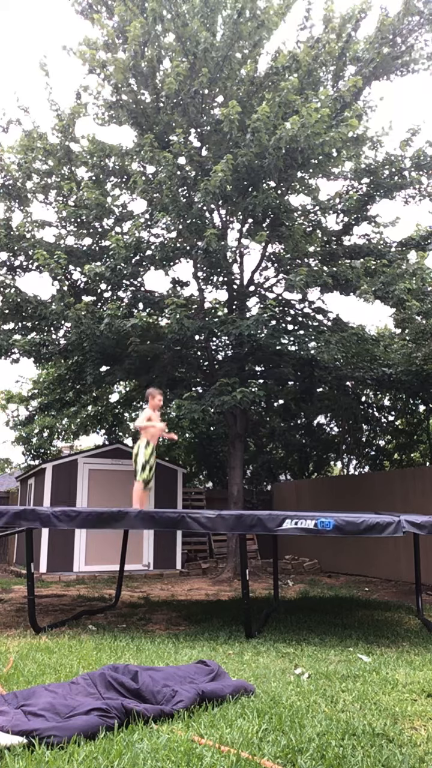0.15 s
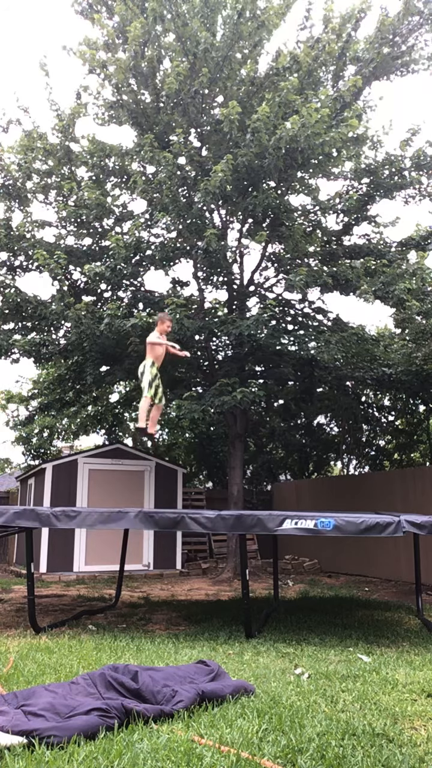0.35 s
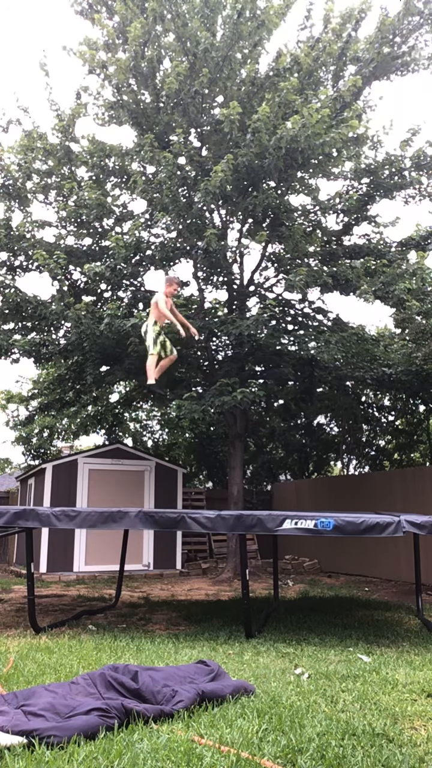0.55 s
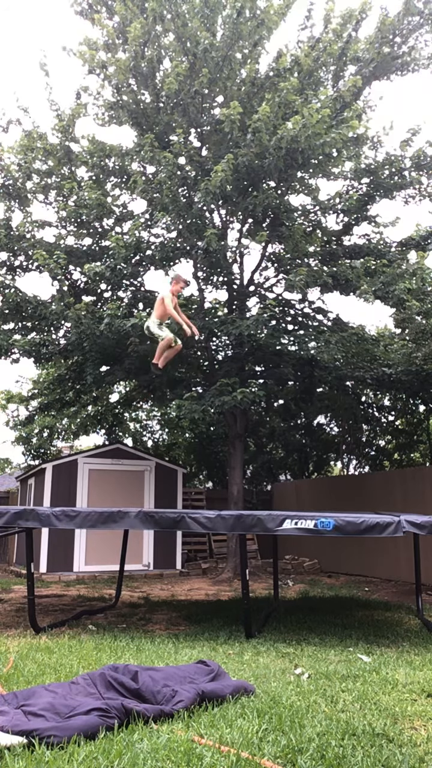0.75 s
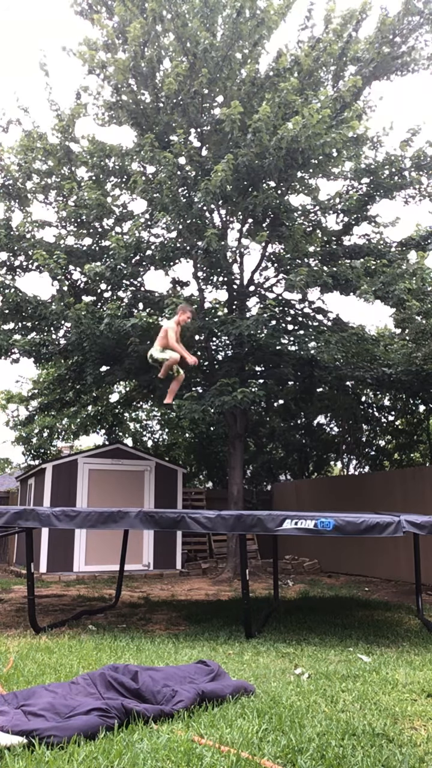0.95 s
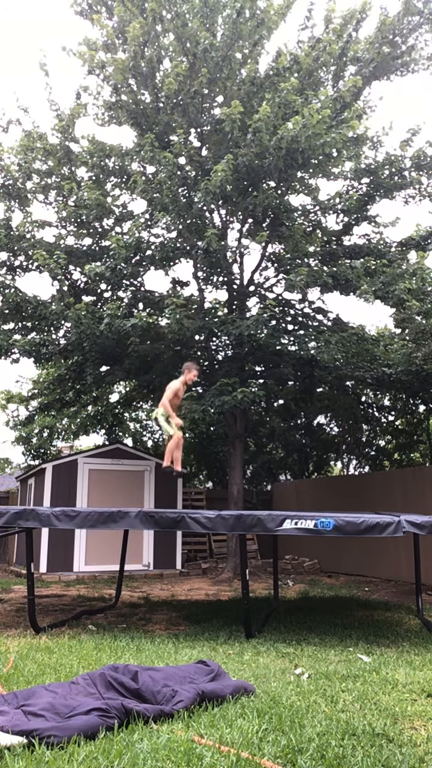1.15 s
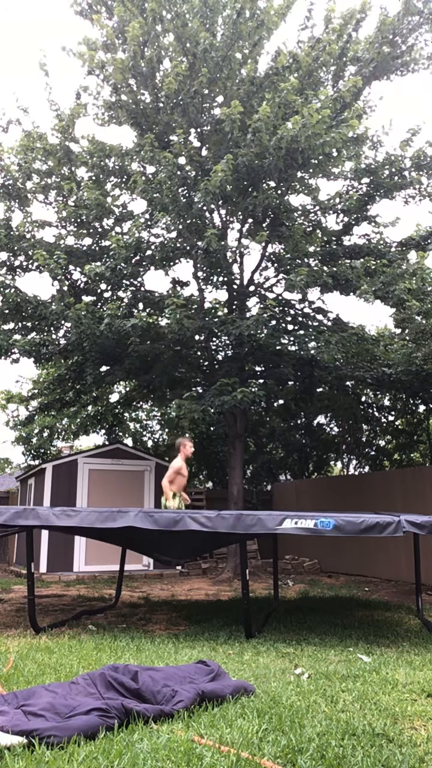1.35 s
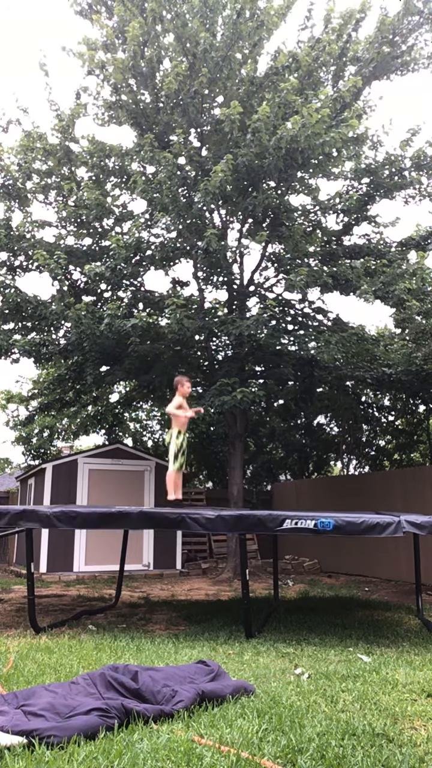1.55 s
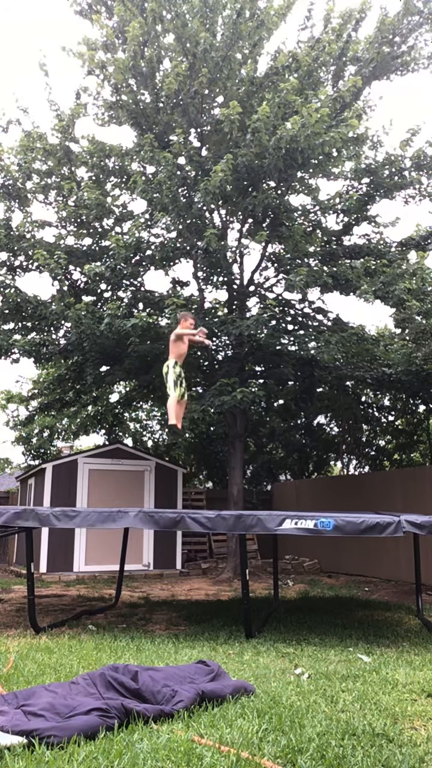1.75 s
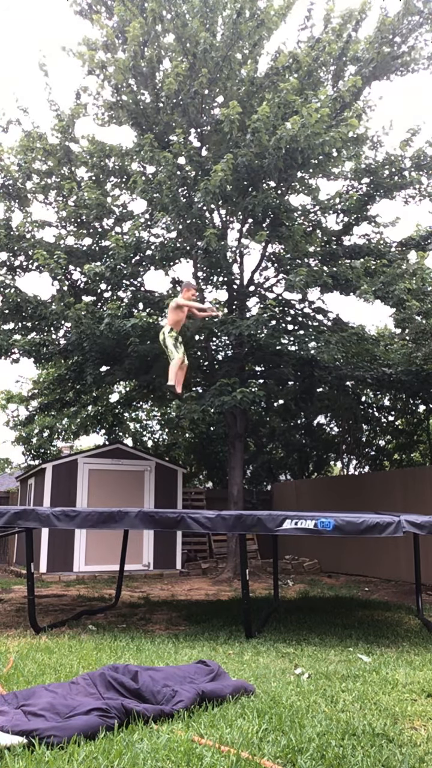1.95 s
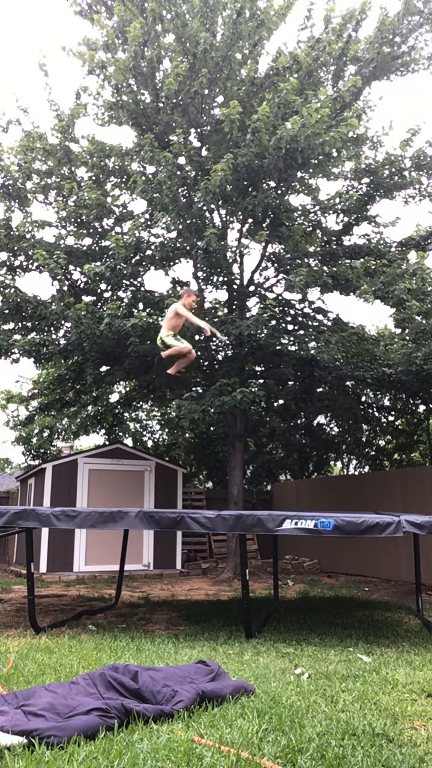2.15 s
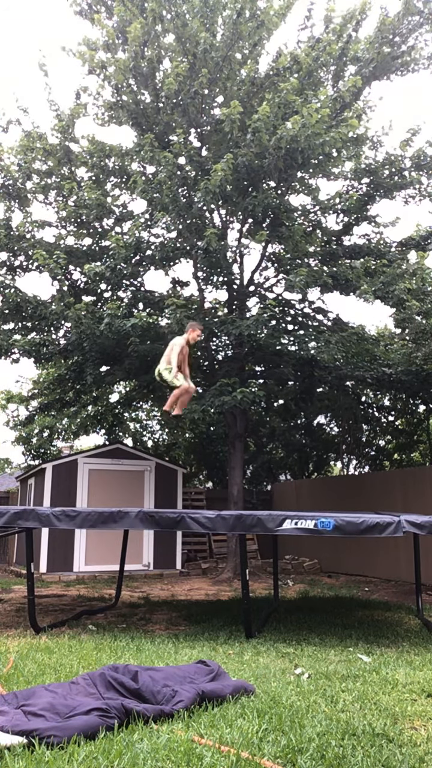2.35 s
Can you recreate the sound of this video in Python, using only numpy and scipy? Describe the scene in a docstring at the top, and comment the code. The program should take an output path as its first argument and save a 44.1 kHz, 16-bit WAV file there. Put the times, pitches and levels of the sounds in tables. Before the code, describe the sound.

Trampoline landings outdoors: two dull, sagging thumps with spring rattle and a lighter knock after each

```python
"""A jumper lands twice on a backyard trampoline: dull mat tones with soft starts and sagging pitch.
Small random jolts ring the mat and frame in a rumble, and a lighter knock follows the second landing.
Air swishes through the weave as shaped noise; springs tick and rattle in brief rings.
Behind lie far traffic hum made of noise bands, pulsing insect noise, and thin tones of a far bird."""
import sys
import numpy as np
from scipy import signal
from scipy.io import wavfile

SR = 44100
rng = np.random.default_rng(int(sys.argv[2]) if len(sys.argv) > 2 else 0)


def magnitude_from_level(level_db):
    """Linear magnitude for a level in decibels (20 dB per decade)."""
    exponent = np.asarray(level_db, float) / 20
    return 10 ** exponent


def wav_out(sig):
    """Save sig, one row per channel (or a flat mono array), as 16-bit PCM at SR to the path in sys.argv[1]."""
    wavfile.write(sys.argv[1], SR, np.round(np.clip(np.atleast_2d(sig).T, -1, 1) * 32767).astype(np.int16))


N = 110250  # samples, 2.5 s


def rms_one(x):
    """Scale a sound to rms 1."""
    return x / np.sqrt(np.mean(x ** 2) + 1e-20)


def in_time(rows):
    """Turn the columns of a timed table into curves over all samples."""
    s, *columns = np.transpose(rows)
    return [np.interp(np.arange(N) / SR, s, c) for c in columns]


def drift(rate):
    """Smoothed random wander around zero with spread 1; a higher rate wanders faster."""
    # made at one point per 40 samples, leaving out the filter's start
    r = np.exp(-80 * np.pi * rate / SR)
    noise = rng.standard_normal(N // 40 + 2002)
    slow = signal.lfilter([1], [1, -2 * r, r * r], noise)[2000:]
    return np.interp(np.arange(N) / 40, np.arange(len(slow)), rms_one(slow - slow.mean()))


def ring(x, hz, t60):
    """A resonance: a unit click starts a sine of height 1 that falls 60 dB in t60 (at least 2 ms)."""
    r = magnitude_from_level(-60 / (max(t60, .002) * SR))
    w = 2 * np.pi * hz / SR
    return signal.lfilter([0, np.sin(w)], [1, -2 * r * np.cos(w), r * r], x + 1e-18)


def band_pass(x, low, high):
    """Keep mainly the sound between two frequencies."""
    return signal.sosfilt(signal.butter(2, [low, high], "band", fs=SR, output="sos"), x)


def banded(spectrum, white, patchy_db, tilt_db=0):
    """Fifth-octave noise bands, each with its level, flicker and tilt about 5 kHz."""
    hzs, dbs = np.transpose(spectrum)
    together = drift(3.0)
    edges = 22 * 2 ** np.arange(0, 9.8, 1 / 5)
    flat, out = 0, 0
    for k, (low, high) in enumerate(zip(edges, edges[1:])):
        hz = np.sqrt(low * high)
        band = band_pass(white[k % 2], low, high)  # neighbours use different noise
        level_db = np.interp(np.log(hz), np.log(hzs), dbs)
        flicker_db = patchy_db * (0.31 * together + drift(12.5))
        band = band * magnitude_from_level(level_db + flicker_db)
        flat = flat + band
        out = out + band * magnitude_from_level(tilt_db * np.log2(hz / 5000))
    return out / np.sqrt(np.mean(flat ** 2))  # rms 1 before the tilt


def whistle(rows, flutter_db, waver):
    """A thin sine with fluttering level and wavering pitch, silent outside its table."""
    hz, db = in_time(rows)
    t = np.arange(N) / SR
    on = (t > rows[0][0]) & (t < rows[-1][0])
    level = np.sqrt(2) * magnitude_from_level(db + flutter_db * drift(44))
    cycles = np.cumsum(hz * (1 + waver * drift(170))) / SR
    return on * level * np.sin(2 * np.pi * cycles)


# colour of the yard's noise: (f/Hz, relative level/dB per Hz)
YARD_COLOUR = [(50, -20), (80, -18.5), (119, 4), (144, -16.5), (174, -1), (246, -10.5), (340, -9.5),
               (420, -15.5), (560, -19), (780, -10.5), (1000, -15), (1340, -13), (1580, -19), (3440, -38.5),
               (5300, -57.5), (8000, -49), (15500, -48.5)]


def yard_hum():
    """Far traffic hum: steady noise, strongest in the bass, with gently flickering bands."""
    return magnitude_from_level(-50) * banded(YARD_COLOUR, rng.standard_normal((2, N)), patchy_db=1.0)


# pulsing insects: (f/Hz, width/Hz, relative level/dB)
INSECTS = [(9400, 300, -85)]
CHIRR_PER_S = 38


def chirr():
    """Insects: narrow noise bands in short quick pulses that come and go."""
    out, t = 0, np.arange(N) / SR
    for hz, width_hz, db in INSECTS:
        band = band_pass(rng.standard_normal(N), hz - width_hz / 2, hz + width_hz / 2)
        cycles = CHIRR_PER_S * t + 0.15 * drift(24)  # slightly uneven pulses
        pulses = np.maximum(np.sin(2 * np.pi * cycles), 0) ** 2
        coming_and_going = np.clip(1 + drift(6), 0, 1.2)
        out = out + 2 * magnitude_from_level(db) * rms_one(band) * pulses * coming_and_going
    return out


FLUTTER_DB = 3  # spread of the level flutter in the short and long thin notes
EDGE_S = .006  # swell and fade of each short note
# short thin notes of a far bird: (t/s, length/s, f/Hz, relative level/dB)
THIN_NOTES = [(.975, .014, 5700, -82), (1.0, .042, 5620, -77), (1.062, .036, 5600, -82),
              (1.116, .087, 5600, -74), (1.216, .014, 5670, -76), (1.247, .065, 5705, -79),
              (1.338, .018, 5717, -74), (1.37, .028, 5715, -80), (1.412, .045, 5720, -83)]


def short_notes():
    """A far bird's short notes swell and glide towards the next, nearly silent between."""
    rows = []
    for note, following in zip(THIN_NOTES, THIN_NOTES[1:] + THIN_NOTES[-1:]):
        s, length, hz, db = note
        next_hz = following[2]
        rows += [(s - EDGE_S, hz, db - 15),
                 (s, hz, db - 4),
                 (s + length, (2 * hz + next_hz) / 3, db + 1),
                 (s + length + EDGE_S, (hz + next_hz) / 2, db - 15)]
    return whistle(rows, FLUTTER_DB, waver=0.001)


# long thin note of a far bird: (t/s, f/Hz, level/dB before flutter)
LONG_THIN_NOTE = [(.12, 5680, -72), (.165, 5660, -62), (.215, 5650, -63), (.28, 5620, -70),
                  (.345, 5600, -62), (.48, 5600, -74)]


def long_note():
    """A far bird holds a thin, high tone, slightly unsteady in pitch and level."""
    return whistle(LONG_THIN_NOTE, FLUTTER_DB, waver=.003)  # waver is a share of the pitch


TICK_T60_S, TICK_SNAP_S = .015, .002  # ringing time; time for the snap to fall to 37 %
# spring ticks: (t/s, relative level/dB, f/Hz)
SPRING_TICKS = [(0.2244, -34, 4220), (0.242, -45, 3865), (0.4658, -50, 3760), (1.5599, -43, 3050),
                (1.6085, -39.5, 4580), (1.699, -61, 4140), (1.8449, -49, 3500), (1.882, -51, 3180),
                (1.908, -49, 4840)]


def ticks():
    """Each tick is a short bright burst of noise that also rings a spring briefly."""
    out, t = np.zeros(N), np.arange(2000) / SR
    for s, db, hz in SPRING_TICKS:
        noise = rng.standard_normal(2000)
        snap = signal.lfilter([1, -1], [1, -1.3, .45], noise) * np.exp(-t / TICK_SNAP_S)
        i = int(s * SR)
        out[i:i + 2000] += magnitude_from_level(db) * (.12 * snap + .1 * ring(snap, hz, TICK_T60_S))
    return out


RATTLES_PER_S, RATTLE_DB = 450, -11  # contacts; level against the swish curve
RATTLE_CYCLES = 24  # cycles in which a coil's ring falls 60 dB


def rattle(level_db):
    """Tiny coil contacts, each ringing one of many springs for a moment."""
    clicks = rng.standard_normal(N) * (rng.random(N) < RATTLES_PER_S / SR)
    pitches = np.geomspace(1900, 9500, num=14)
    dealt = rng.integers(0, 14, N)  # which spring each click hits
    coils = sum(ring(clicks * (dealt == k), hz, RATTLE_CYCLES / hz) for k, hz in enumerate(pitches))
    return magnitude_from_level(level_db + RATTLE_DB) * rms_one(coils)


SWISH_GRAIN_DB, SWISH_PATCHY_DB = 1, 1.1  # fast flicker of the noise; flicker of each band
# air through the weave: (t/s, level/dB before tilt, tilt/dB per octave about 5 kHz)
SWISH_CURVE = [(.04, -67.5, -3.5), (.1, -65.5, -2.5), (.112, -54.5, -0.5), (.15, -52, -0.5), (.21, -52, -4),
               (.235, -46, -3), (.27, -52.5, -6), (.31, -51.5, -0.5), (.37, -48.5, -2.1),
               (.45, -59.5, -4.5), (.56, -60, -3), (.65, -68.5, -6), (.7, -71, -4), (.712, -63.5, -3.5),
               (.755, -66, -4), (.8, -75, -3.5), (1.44, -72.5, -2.5), (1.57, -52.5, -4), (1.61, -50, -4),
               (1.655, -54.5, -2), (1.69, -49, 1.5), (1.78, -53, -3), (1.83, -60.5, -6), (1.9, -56.5, -2.2),
               (2.01, -68.5, -3.5), (2.065, -65.5, -3), (2.12, -73, -7.5)]
# colour of the air noise: (f/Hz, relative level/dB per Hz)
AIR_COLOUR = [(350, -68), (710, -20), (1200, 1.5), (1360, -10), (1820, -4.5), (2410, -6.5), (4730, -8.5),
              (10800, -15), (15500, -35)]


def swish():
    """Air through the weave: grainy hiss that turns brighter or duller, with the springs rattling along."""
    level_db, tilt_db = in_time(SWISH_CURVE)
    white = rng.standard_normal((2, N)) * magnitude_from_level(SWISH_GRAIN_DB * drift(114))
    air = magnitude_from_level(level_db) * banded(AIR_COLOUR, white, SWISH_PATCHY_DB, tilt_db)
    return air + rattle(level_db)


SHAKES_PER_S = 700  # average jolts to each resonance
# shaking of mat and frame: (t/s, level/dB before tilt, tilt/dB per octave about 250 Hz)
SHAKING = [(0, -44.5, 0.5), (.14, -58, -9.5), (.19, -41.5, 6), (.225, -24.5, -8), (.25, -29, 1.5),
           (.34, -37, -3), (.45, -47.5, -4), (.5, -42, 2), (.56, -45, 1), (.7, -58, -7), (1.38, -72.5, -16),
           (1.42, -42, -11.5), (1.5, -69, -2), (1.555, -41, 5), (1.6, -25.5, -2), (1.655, -36.5, -0.5),
           (1.82, -49, -1.5), (1.855, -41, 4), (1.9, -41.5, 0.7), (2.01, -52.5, -1.5), (2.5, -60, -8)]
# resonances of mat and frame: (f/Hz, relative level/dB, t60/s)
MAT_MODES = [(62.3, -32, 0.51), (123.4, -1.5, 0.083), (160, -0.5, 0.028), (190, 6.5, 0.037),
             (271.5, -0.5, 0.059), (336, 1.5, 0.057), (416, -6.5, 0.038), (491, -7.5, 0.056),
             (587, -2.5, 0.016), (727, -3.5, 0.015), (863, -5, 0.03), (1087, -15, 0.029),
             (1406, -14.5, 0.055), (1776, -44.5, 0.096)]


def rumble():
    """Small random jolts ring the mat's resonances; the rumble turns brighter or duller along its table."""
    level_db, tilt_db = in_time(SHAKING)
    steady, shaken = 0, 0
    for hz, db, t60 in MAT_MODES:
        jolts = rng.standard_normal(N) * (rng.random(N) < SHAKES_PER_S / SR)
        steady = steady + magnitude_from_level(db) * ring(jolts, hz, t60)
        shake_db = db + level_db + tilt_db * np.log2(hz / 250)
        shaken = shaken + ring(jolts * magnitude_from_level(shake_db), hz, t60)
    return shaken / np.sqrt(np.mean(steady ** 2))  # as if the steady rumble had rms 1


RISE_CYCLES = 1  # soft onset
SAG_HZ, SAG_S = 116, 0.0048  # extra starting pitch of a 0 dB blow; time for it to fall to 37 %
SAG_FOLLOWS = 0.17  # harder blows stretch the mat more: dB of extra pitch per dB of blow
# blows on the mat: (t/s, relative level/dB, settled f/Hz, t60/s)
BLOWS = [(0.028, -43.5, 254, 0.059), (0.077, -39, 148, 0.059), (.229, -30, 737, 0.055),
         (0.228, -4, 172.4, 0.048), (.238, -13.5, 308.6, 0.041), (.249, -18, 129, 0.094),
         (.254, -23, 406.6, 0.051), (0.28, -25.5, 190, 0.022), (0.289, -23, 319.7, 0.038),
         (0.314, -27, 114, 0.045), (.46, -39.5, 268, 0.045), (.522, -43.5, 840, 0.053),
         (.523, -21.5, 166, 0.057), (1.402, -25, 148.7, 0.031), (1.59, -13.5, 144, 0.057),
         (1.594, -24, 306, 0.061), (1.611, -25, 342, 0.041), (1.615, -45, 67.4, 0.39),
         (1.628, -22, 142, 0.075), (1.861, -29.5, 307, 0.029), (1.866, -18.5, 161, 0.039),
         (1.903, -29, 166, 0.066), (1.947, -35.5, 173, 0.081)]


def thumps():
    """Each blow is a soft-edged membrane tone: its pitch starts higher while the mat is stretched."""
    out = np.zeros(N + SR)  # room for the last tails
    t = np.arange(SR // 2) / SR
    for s, db, hz, t60 in BLOWS:
        sag_hz = SAG_HZ * magnitude_from_level(SAG_FOLLOWS * db)
        phase = 2 * np.pi * (hz * t + sag_hz * SAG_S * (1 - np.exp(-t / SAG_S)))
        rise = 1 - np.exp(-(t * hz / RISE_CYCLES) ** 2)
        i = int(s * SR)
        out[i:i + len(t)] -= 2 * magnitude_from_level(db - 60 * t / t60) * np.sin(phase) * rise
    return out[:N]


# echoes from fence and shed: (delay t/s, level/dB)
FENCE_AND_SHED = [(0.051, -16), (0.082, -23)]


def with_echoes(near):
    """Fence and shed return later, quieter copies of a sound with the treble dulled."""
    dull = signal.lfilter([.2], [1, -.8], near)
    out = near
    for s, db in FENCE_AND_SHED:
        out = out + magnitude_from_level(db) * np.concatenate([np.zeros(int(s * SR)), dull])[:N]
    return out


def scene():
    """Add the trampoline to the yard; only thumps and ticks have outdoor echoes."""
    yard = yard_hum() + chirr() + short_notes() + long_note()
    near = with_echoes(ticks() + thumps())
    return (yard + swish() + rumble() + near)[None]


def roll_off(x):
    """The treble ends steeply here."""
    return signal.sosfilt(signal.butter(12, 15690, fs=SR, output="sos"), x)


def record(dry):
    """A phone microphone cuts the bass steeply below 52 Hz."""
    bass_cut = signal.butter(8, 52, "high", fs=SR, output="sos")
    mix = signal.sosfilt(bass_cut, dry)
    return roll_off(mix)


dry = scene()
out = record(dry)
wav_out(out)
```